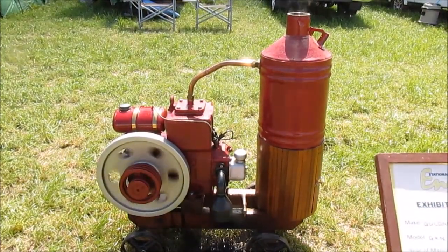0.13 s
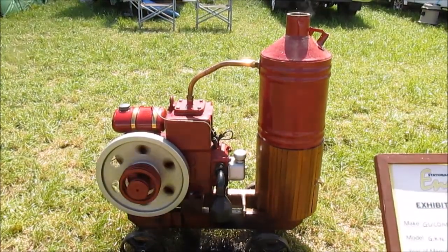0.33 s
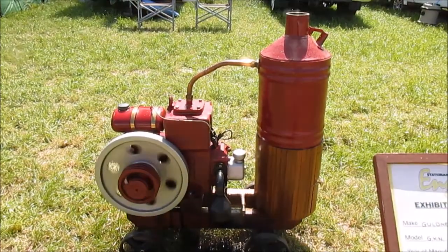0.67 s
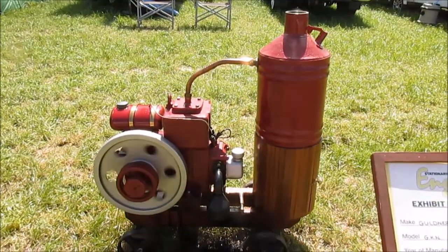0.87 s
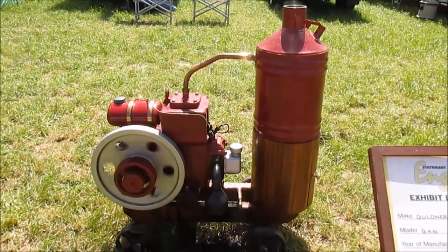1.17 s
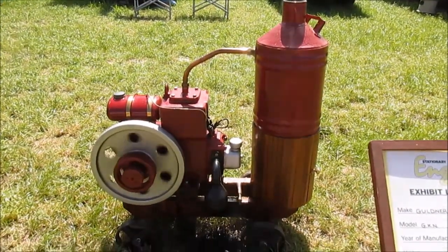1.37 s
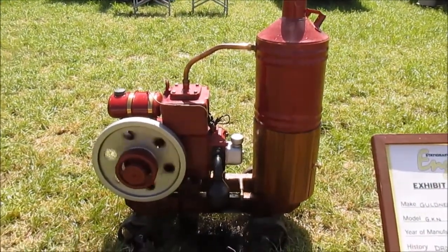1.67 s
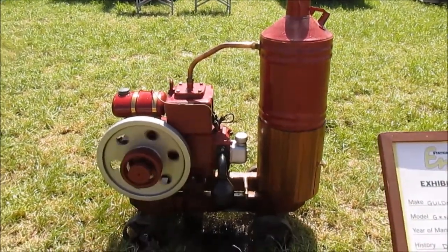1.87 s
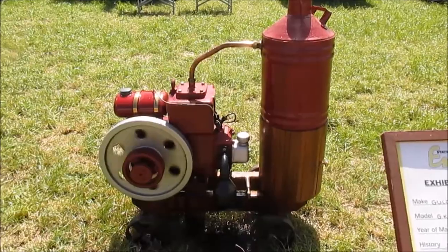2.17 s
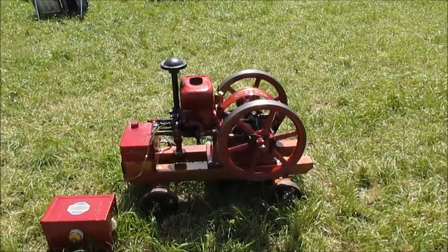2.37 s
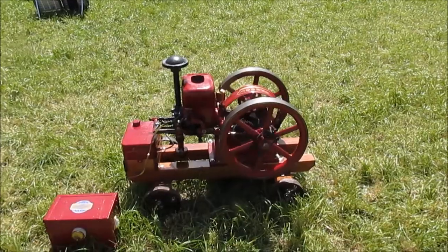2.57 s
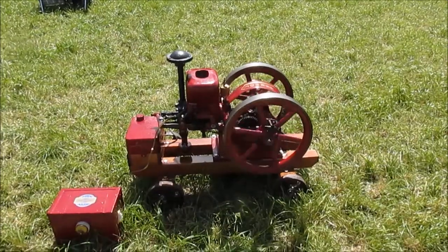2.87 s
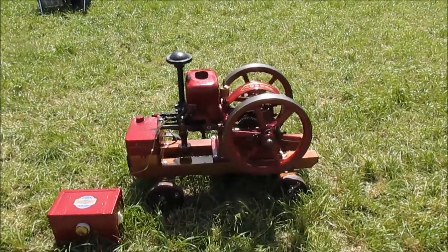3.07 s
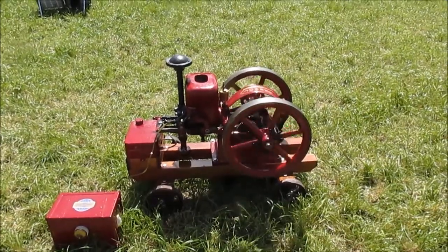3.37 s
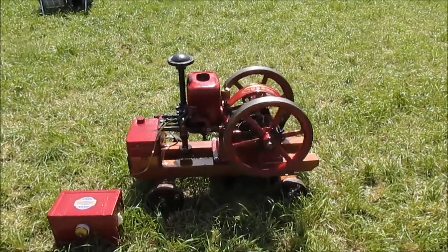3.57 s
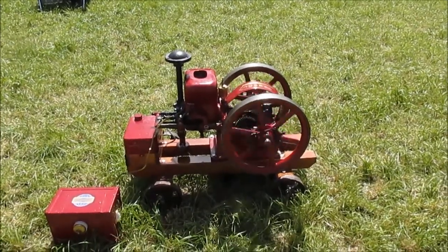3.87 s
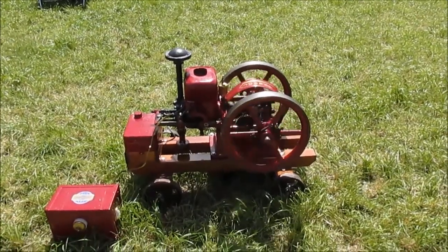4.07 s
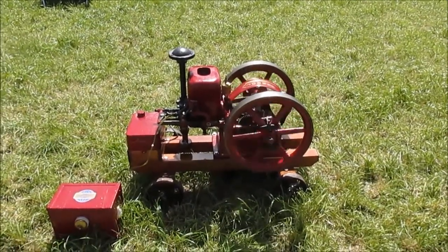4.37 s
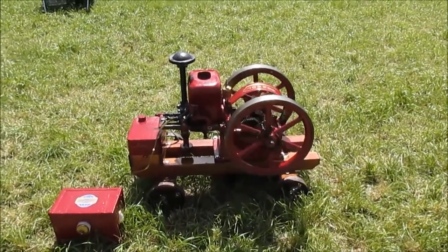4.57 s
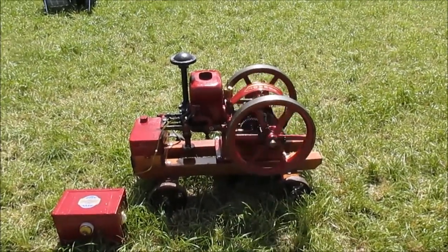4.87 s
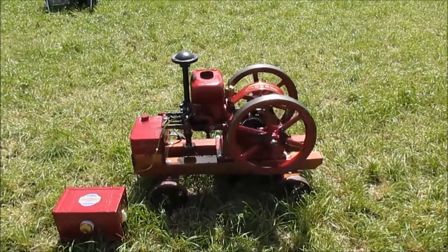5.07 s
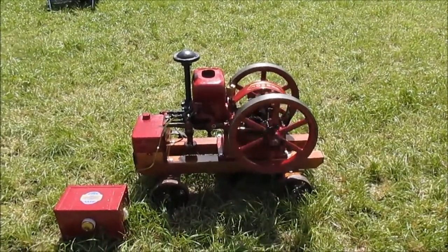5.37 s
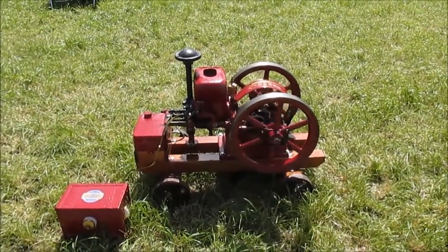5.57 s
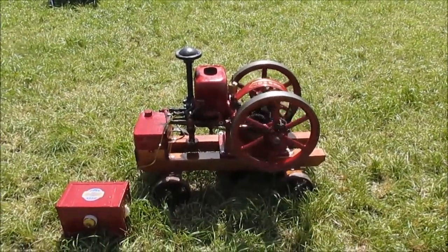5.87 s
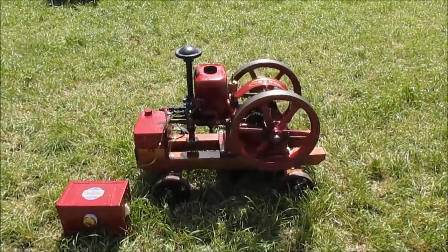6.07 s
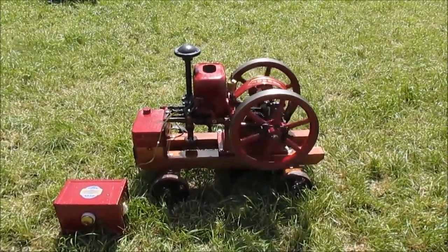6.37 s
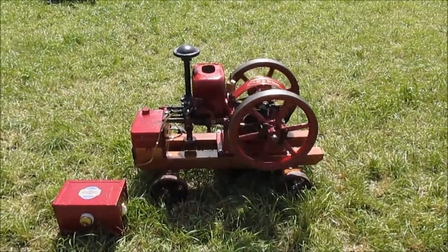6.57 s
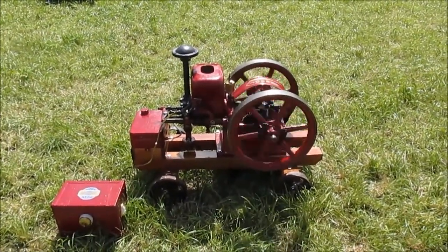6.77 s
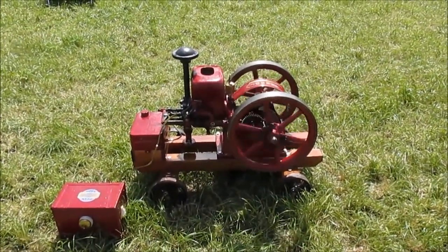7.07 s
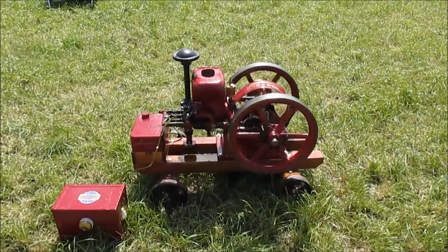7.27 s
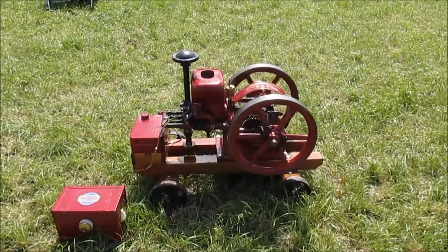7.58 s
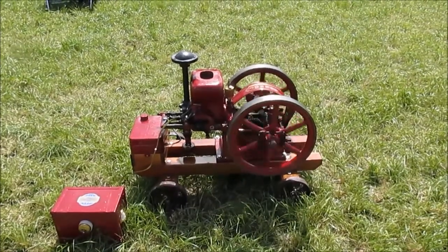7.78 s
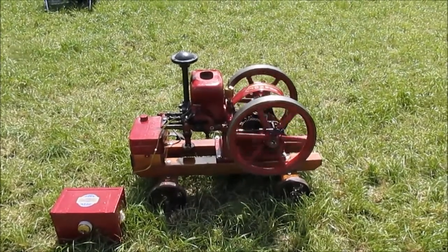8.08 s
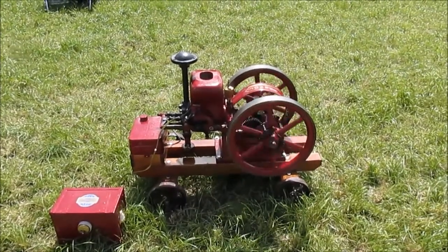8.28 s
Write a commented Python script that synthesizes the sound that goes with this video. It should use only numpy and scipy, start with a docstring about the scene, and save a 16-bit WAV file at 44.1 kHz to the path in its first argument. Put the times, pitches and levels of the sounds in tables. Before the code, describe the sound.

A small old engine runs close by in the open air with a quick, steady metallic clatter and chuffing exhaust. After a short silent gap, a hit-and-miss engine takes over in front: it clicks, fires with a snap and hiss, and coasts while its valve gear clacks ever more slowly, then does it all again. Behind it, to the right, a fast engine buzzes and distant engines rumble and hum at wandering pitches.

```python
"""Two old stationary engines on a grass show field, one after the other.
First a small upright engine clatters for two seconds: its tappet, exhaust and piston take turns, nine
cycles a second. After a short silence, far engines drone and a fast one runs off to the right. In front,
a hit-and-miss engine fires near 3 s and again near 6 s, with a sharp hiss that pushes the gain control
down. After each firing it coasts on its flywheels, the valve gear clacking ever more slowly."""
import sys
import numpy as np
from scipy import signal
from scipy.fft import rfft, irfft, next_fast_len
from scipy.io import wavfile
from scipy.ndimage import uniform_filter1d, minimum_filter1d

SR = 44100
rng = np.random.default_rng(int(sys.argv[2]) if len(sys.argv) > 2 else 0)


def put_to_file(sound):
    """Save the sound as 16-bit audio at rate SR, in the file named by the first command-line argument."""
    columns = np.atleast_2d(sound).T  # one column per channel
    safe = np.clip(columns, -1, 1)
    whole_steps = np.round(safe * 32767)
    wavfile.write(sys.argv[1], SR, whole_steps.astype(np.int16))


N = 371322
TIME = np.arange(N) / SR
FFT_SIZE, BLOW_SIZE = next_fast_len(N + SR // 2), 2 ** 14
FREQS, BLOW_FREQS = np.fft.rfftfreq(FFT_SIZE, 1 / SR), np.fft.rfftfreq(BLOW_SIZE, 1 / SR)
FIRST_ENDS_S, SECOND_STARTS_S = 2.127, 2.351

# Tone colours. Each row: frequency in Hz, level in dB.
FIRST_FIELD_WASH = [(25, -15), (50, -10.5), (85, -1.5), (130, -3.5), (230, -6.5), (320, -6.5), (480, -17),
                    (750, -7), (1040, -18), (1520, -19), (2200, -25), (3200, -23.5), (4200, -32.5),
                    (6500, -30), (10000, -40), (15000, -44)]  # the whole field, behind the upright engine
SECOND_FIELD_WASH = [(25, -17), (50, -11), (78, 4), (120, -5), (180, 3.5), (240, -8), (310, -4.5),
                     (420, -7), (650, -18), (1000, -15.5), (1650, -16), (2150, -23.5), (6000, -28),
                     (15000, -48)]  # and behind the hit-and-miss engine
FAST_EXHAUST = [(30, -32), (100, -7), (175, 6), (250, 5), (320, 0), (420, -3), (600, -21.5), (1500, -29),
                (5000, -29.5), (16000, -38.5)]
FAST_PUFF = [(1500, -20), (3000, -7), (6000, -1), (9300, 0), (11500, -8), (14000, -9), (15500, -2)]
FIRING_HISS = [(1500, -35), (3000, -14), (4800, -3), (7000, -7), (9500, -7), (11500, -1), (13000, 0),
               (16000, 0)]
SCATTERED_SHARE = [(100, -16), (600, -8.5), (1400, -5.5), (3000, -1), (15000, 3)]  # scattered sound compared with direct sound
LEFT_SHADE = [(200, 0), (700, 0), (1300, -1.5), (3200, -6.5), (6000, -1.5), (15000, -1)]  # how sound from the right is dulled on the left
LEFT_OVER_RIGHT = [(60, 6), (110, 5), (200, 4.5), (380, 2), (700, 2.5), (1290, 1), (2380, 1), (4400, 0),
                   (8120, 1.0), (15000, 1.5)]  # the two microphone openings are unequal

# Two far engines. Each row: time in seconds, pitch in Hz, level in dB.
WANDERING_DRONE = [(2.35, 117, -27.5), (2.8, 120, -23), (3.15, 103.5, -32.5), (3.65, 108, -23.5),
                   (4.2, 103, -33.5), (5.0, 110, -23.5), (5.7, 118.6, -23), (6.15, 111.5, -21.5),
                   (7.9, 122.5, -19.5), (8.42, 132, -17)]
REVVING_DRONE = [(2.35, 84, -22), (2.7, 92.5, -28.5), (3.85, 89.5, -24.5), (4.299, 109, -21.5),
                 (4.7, 126, -23.5), (5.0, 121.3, -22), (5.3, 127, -23), (5.949, 124.2, -26),
                 (6.3, 112.3, -53)]  # climbs past the other, beats against it and fades
# A higher whine from further away. Each row: time in seconds, pitch in Hz.
FAR_WHINE = [(2.75, 325), (3.4, 308), (4.65, 294), (5.25, 322), (5.65, 331), (6.1, 312), (6.8, 322),
             (8.42, 317)]
# The fast engine's speed. Each row: time in seconds, firings a second.
FAST_SPEED = [(2.35, 35.53), (5.8, 35.47), (7.07, 36.02), (8.42, 35.62)]

# Loudness over time. Each row: time in seconds, level in dB.
NEIGHBOUR_SWELL = [(2.5, 1.3), (5.3, 1.48), (7.0, -1), (7.7, 1), (8.42, 0)]  # the fast and far engines swell and ebb together
UPRIGHT_EFFORT = [(0, -21.5), (.53, -24.5), (.75, -23), (1.6, -21.5), (2.12, -23.5)]  # how hard the upright engine works
# Single events. Each row: start in seconds, level in dB.
FAR_BOOMS = [(2.352, -8.5), (7.53, 3.5)]
EXHAUST_THUDS = [(0.389, -13), (0.823, -10.5), (0.945, -9), (1.153, -12), (1.814, -12.5), (2.034, -14)]  # the upright engine fires hard

# The hit-and-miss engine fires. Each row: start in seconds, level in dB, wind-up since the last clack
# in seconds, that clack's level in dB, length of a cycle just after firing in seconds.
FIRING_STROKES = [(2.962, 0.5, .340, -12.5, .4065), (6.034, -2, .331, -17, .401)]
# Before each firing the latch lets go and the igniter trips.
# Each row: share of the wind-up gone by, dB added to the firing's level, ringing pitch in Hz.
IGNITER_TRIPS = [(.26, -16.5, 5160), (.567, -17, 4730), (.908, -26, 4700)]

# The blows that one event sets off. Each row: delay in seconds, dB added to the event's level, low and
# high edge in Hz, rise and decay in seconds, rattle from 0 (one clean knock) to 1 (all rattle).
BOOM_PARTS = [(0.0034, -17, 100, 128.4, .01, .03, 0.14)]
THUD_PARTS = [(0.001, -2.5, 71, 171, .002, .005, .1)]
UPRIGHT_PARTS = [ (-.0245, -5, 2210, 14000, .0006, 0.0046, 0.8),
                 (-.024, -18.5, 670, 950, 0.0022, .008, 0.4), (0, 3.5, 1350, 1850, .002, .005, .3),
                 (0, -10, 796, 3000, 0.002, 0.006, 1), (.015, 3.5, 480, 590, .005, .009, .4),
                 (.015, -3.5, 640, 2500, 0.0055, 0.022, 1), (0.024, -1.5, 130, 300, 0.0018, 0.0059, 0.3),
                 (.04, -3.5, 1300, 9000, 0.0053, 0.0075, 0.66), (.0535, 9, 280, 350, .001, .004, .03),
                 (.054, 8, 620, 1000, .0005, .002, .05), (.053, -1, 1384, 6940, 0.00091, 0.0035, 0.92)]  # tappet, valve gear, exhaust chuff, gear rattle, piston knock
CLACK_PARTS = [ (0, -3.5, 2100, 6400, 0.0017, 0.0047, 0.79), (0.0018, .3, 840, 1800, .0007, 0.007, .38),
               (0, -17, 12500, 13500, .001, .005, .5)]  # the cam meets the roller, the iron frame knocks, a faint ping
DROP_PARTS = [(0, -1.5, 4600, 10400, 0.0005, 0.0011, 0.78), (.003, -8, 870, 8800, 0.0013, 0.0073, 1)]  # the push rod drops on the governor latch
FIRING_PARTS = [ (0, -11, 3600, 14900, 0.00014, 0.0042, 0.67),
                (0.106, -14, 4640, 11300, 0.0064, 0.0083, 0.98), (.106, -16, 600, 1290, 0.012, 0.011, 0.96),
                (0.214, -14.5, 1200, 11200, 0.00057, 0.0083, .9)]  # ignition snaps, the exhaust opens and coughs, the latch catches

# How the iron castings ring. Each row: pitch in Hz, width in Hz, level in dB.
UPRIGHT_RINGS = [(159, 15, 6), (295, 52, 10), (553, 42, 0.5), (727, 170, -1), (910, 78, -2.5),
                 (1216, 100, -5), (1517, 54, -0.5), (1630, 51, -24.5), (2750, 1700, -15.5),
                 (5630, 1300, -14), (6540, 330, -19.5), (8250, 340, -22), (12600, 5300, -20.5)]
HIT_AND_MISS_RINGS = [(744, 210, 3), (932, 100, 3.5), (1158, 130, 8), (1580, 45, 8.5), (1814, 54, 2),
                      (2370, 710, -4), (2950, 600, -6.5), (3680, 400, -14.5), (4500, 1150, -3.5),
                      (5900, 1400, -7), (8240, 1300, -6.5), (12700, 450, -10)]


def amp(db):
    """Turns decibels into a number to multiply by."""
    return 10 ** (np.asarray(db) / 20)


def unit_level(x):
    """Scales x to an average (rms) level of one."""
    return x / np.sqrt(np.mean(abs(x) ** 2) + 1e-20)


def curve(points):
    """Joins (seconds, value) points with straight lines."""
    return np.interp(TIME, *np.transpose(points))


def tone_colour(points):
    """The gain at every frequency, from (Hz, dB) points."""
    hz, db = np.transpose(points)
    return amp(np.interp(np.log(FREQS + 1), np.log(hz + 1), db))


def filtered(x, response):
    """Gives each frequency in x its own gain."""
    return irfft(rfft(x, FFT_SIZE) * response, FFT_SIZE)[..., :N]


def noise(colour):
    """Noise at level one with the given tone colour."""
    return unit_level(filtered(rng.standard_normal(N), tone_colour(colour)))


def waver(hz):
    """A random wobble at level one, with little in it faster than hz."""
    steps = TIME[::128]
    smoothing = np.exp(-(np.fft.rfftfreq(len(steps), steps[1]) / hz) ** 2)
    wobble = irfft(rfft(rng.standard_normal(len(steps))) * smoothing, len(steps))
    return np.interp(TIME, steps, unit_level(wobble))


def ringing(rings):
    """How a body with these (Hz, width in Hz, dB) rings answers each frequency."""
    f = BLOW_FREQS
    return sum(amp(db) * 1j * f * width / (hz ** 2 - f ** 2 + 1j * f * width) for hz, width, db in rings)


def strike(events, blows, body):
    """Each blow is a clean push plus a rattle; its hardness picks the band of the body that rings."""
    out, t = np.zeros(N + 2 * BLOW_SIZE), TIME[:BLOW_SIZE // 2]
    for delay, db, low_hz, high_hz, rise, decay, rattle in blows:
        envelope = burst(t, rise, decay)
        force = np.sqrt(rattle) * envelope * rng.standard_normal((len(events), len(t)))
        force[:, 0] += np.sqrt(1 - rattle) * np.linalg.norm(envelope)  # the clean push
        low, high = 1j * BLOW_FREQS / low_hz, 1j * BLOW_FREQS / high_hz
        band = low ** 2 / (1 + np.sqrt(2) * low + low ** 2) / (1 + np.sqrt(2) * high + high ** 2)
        sounds = irfft(rfft(force, BLOW_SIZE) * unit_level(band * body))
        for (start, event_db), sound in zip(events, sounds):
            at = max(int((start + delay) * SR), 0)
            out[at:at + BLOW_SIZE] += amp(db + event_db) * sound
    return out[:N]


def burst(t, rise_s, decay_s):
    """A level that swells from t = 0 and dies away."""
    return np.clip(t / rise_s, 0, 1) * np.exp(-np.maximum(t - rise_s, 0) / decay_s)


def outdoors(x, scatter_db, left_lag_s=0):
    """Adds scatter off grass and ironwork; sound from the right reaches the left late and shaded."""
    share = tone_colour(SCATTERED_SHARE) * amp(scatter_db)
    scattered = filtered(x, share * np.exp(-2j * np.pi * FREQS * .002))  # 2 ms late
    slices = signal.stft(scattered, nperseg=256)[2]
    slices = slices * np.exp(2j * np.pi * rng.random((2, *slices.shape)))  # jumbled anew for each side
    stereo = x + np.std(scattered) * unit_level(signal.istft(slices)[1][:, :N])
    response = 1 / np.sqrt(1 + share ** 2)  # so the scatter adds no loudness
    if left_lag_s:
        left = np.sqrt(tone_colour(LEFT_SHADE)) * np.exp(-1j * np.pi * FREQS * left_lag_s)
        response = response * np.array([left, 1 / left])
    return filtered(stereo, response)


def exhaust_hum(hz, overtones_db, flutter):
    """A far exhaust: one low note and weak overtones, a little unsteady in pitch and level."""
    turns = np.cumsum(hz * (1 + .0073 * waver(14.6))) / SR
    tone = sum(amp(db) * np.sin(2 * np.pi * k * turns) for k, db in enumerate([0] + overtones_db, 1))
    return unit_level(tone) * (1 + flutter * waver(13))


def far_engines(whine_db=-32.5):
    """The rumble of many engines, two wandering drones, a whine and two dull booms."""
    out = amp(-22.5) * noise(SECOND_FIELD_WASH) * amp(.88 * waver(9.9))
    whine = [(time, hz, whine_db) for time, hz in FAR_WHINE]
    for engine in (WANDERING_DRONE, REVVING_DRONE, whine):
        times, hz, db = np.transpose(engine)
        hum = exhaust_hum(np.interp(TIME, times, hz), [-19, -20], flutter=.077)
        out += amp(np.interp(TIME, times, db)) * hum
    return out + strike(FAR_BOOMS, BOOM_PARTS, ringing([(84.6, 9, 0)]))


def fast_engine(unevenness=.14):
    """One exhaust pulse a turn, and a puff of hiss about half a turn later."""
    turns = .71 + np.cumsum(curve(FAST_SPEED) * (TIME > SECOND_STARTS_S)) / SR
    pulses = np.diff(np.floor(turns - .45), prepend=0.) * (1 + unevenness * waver(25))
    exhaust = unit_level(filtered(pulses, tone_colour(FAST_EXHAUST)))
    puffs = unit_level(np.exp(1.4 * np.cos(2 * np.pi * turns)))
    return amp(-30.5) * exhaust + amp(-39.5) * puffs * noise(FAST_PUFF)


def neighbours(surge_db=6, settle_s=.065):
    """The fast and far engines, off to the right: the level starts high and quickly settles, then they swell
    and ebb."""
    elapsed = np.maximum(TIME - SECOND_STARTS_S, 0)
    level_db = curve(NEIGHBOUR_SWELL) + surge_db * np.exp(-elapsed / settle_s)
    engines = (fast_engine() + far_engines()) * amp(level_db)
    return outdoors(engines, scatter_db=2, left_lag_s=.00013)


def upright_engine(first_beat_s=.0462, cycle_s=.10907):
    """Tappet, exhaust and piston take turns at a steady speed, over two hums and the field's wash."""
    times = np.arange(first_beat_s, FIRST_ENDS_S, cycle_s)
    beats = np.column_stack([times, np.interp(times, *np.transpose(UPRIGHT_EFFORT))])
    clatter = strike(beats, UPRIGHT_PARTS, ringing(UPRIGHT_RINGS))
    thuds = strike(EXHAUST_THUDS, THUD_PARTS, ringing([(130, 100, 0)]))
    hums = amp(-27) * exhaust_hum(156.3, [-14], flutter=.089)
    hums += amp(-35) * exhaust_hum(118.4, [-15], flutter=.41)
    wash = amp(-26) * noise(FIRST_FIELD_WASH)
    return outdoors(clatter + thuds + hums + wash, scatter_db=-1)


def valve_gear(frame, clack_db=-16, drop_db=-13, first_clack_cycles=1.345, drop_cycles=.152):
    """The cam lifts the push rod with a clack and the rod drops again, until the governor lets go."""
    releases = [(start - wind_up, db) for start, _, wind_up, db, _ in FIRING_STROKES]
    coast_ends = [time for time, _ in releases[1:]] + [N / SR]
    clacks, drops = [], []
    for (start, *_, cycle_s), end in zip(FIRING_STROKES, coast_ends):
        at, loss_db = start + first_clack_cycles * cycle_s, 0
        while at + drop_cycles * cycle_s < end:
            clacks.append((at, clack_db - loss_db))
            drops.append((at + drop_cycles * cycle_s, drop_db - loss_db))
            at += cycle_s
            cycle_s *= 1.038  # the flywheels slow, so each cycle is longer
            loss_db += .25  # and softer
    return strike(releases + clacks, CLACK_PARTS, frame) + strike(drops, DROP_PARTS, frame)


def igniter_clicks():
    """Three bright clicks lead up to each firing as the latch lets go and the igniter trips."""
    out, click = np.zeros(N), [(0, 1, 920, 36000, .00017, .0054, .79)]  # one blow, as in the tables
    for share, trip_db, hz in IGNITER_TRIPS:
        trips = [(start - (1 - share) * wind_up, db + trip_db)
                 for start, db, wind_up, *_ in FIRING_STROKES]
        out += strike(trips, click, ringing([(hz, 2200, 0)]))
    return out


def gas_hiss(firings):
    """Gas hisses out under the pressure of each firing."""
    pressure = np.zeros(N)
    for start, db in firings:
        cut_off = np.interp(TIME - start, [.11, .135], [1, 0])
        pressure += amp(db) * cut_off * burst(TIME - start - .01, rise_s=.016, decay_s=.036)
    return amp(-6) * pressure * noise(FIRING_HISS)


def hit_and_miss_engine():
    """The valve gear and the firings knock the iron frame, and each firing hisses."""
    frame = ringing(HIT_AND_MISS_RINGS)
    firings = [(start, db) for start, db, *_ in FIRING_STROKES]
    knocks = valve_gear(frame) + strike(firings, FIRING_PARTS, frame)
    return outdoors(knocks + igniter_clicks() + gas_hiss(firings), scatter_db=-1)


def scene():
    """The upright engine, a short silence, then the hit-and-miss engine among its neighbours."""
    second = neighbours() + hit_and_miss_engine()
    fade_out = np.clip((FIRST_ENDS_S - TIME) / .003 + 1, 0, 1)
    fade_in = np.clip((TIME - SECOND_STARTS_S) / .001, 0, 1)
    return upright_engine() * fade_out + second * fade_in


def gain_control(x, threshold_db=-31, slope=.43, attack_s=.044, hold_s=.15, recovery_db_per_s=20):
    """Loud top treble turns everything down quickly; the level waits, then slowly comes back."""
    treble = signal.sosfilt(signal.butter(4, 11000, "high", fs=SR, output="sos"), x.mean(0))
    treble_db = 10 * np.log10(abs(uniform_filter1d(treble ** 2, size=1000)) + 1e-12)
    over_db = np.maximum(treble_db - threshold_db, 0)
    half_hold = int(hold_s * SR / 2)
    held_db = -minimum_filter1d(-slope * over_db, 2 * half_hold + 1, origin=half_hold)
    recovery_db = recovery_db_per_s * TIME
    cut_db = np.maximum.accumulate(held_db + recovery_db) - recovery_db
    smoothing = np.exp(-1 / (attack_s * SR))
    return x / amp(signal.lfilter([1 - smoothing], [1, -smoothing], cut_db))


def record(dry):
    """The microphone favours the left, the gain control acts, and sound above 16200 Hz is cut."""
    left = np.sqrt(tone_colour(LEFT_OVER_RIGHT))
    heard = gain_control(filtered(dry, np.array([left, 1 / left])))
    low_pass = signal.firwin(511, 16200, window=("kaiser", 9), fs=SR)
    return signal.oaconvolve(heard, low_pass[None], "same")


dry = scene()
out = record(dry)
put_to_file(out)
```